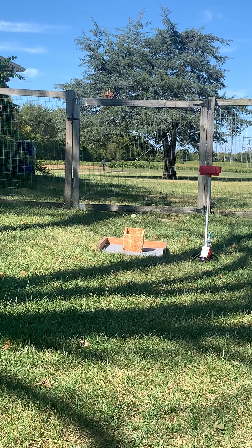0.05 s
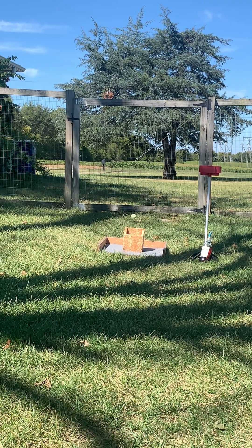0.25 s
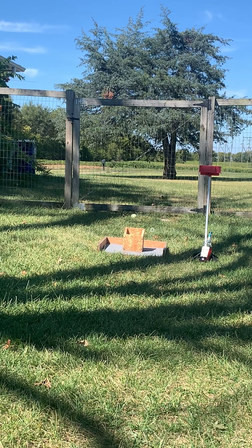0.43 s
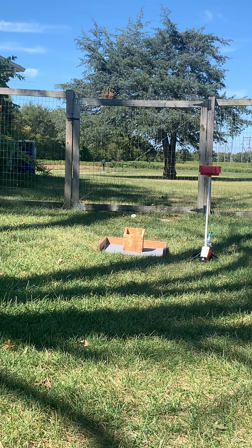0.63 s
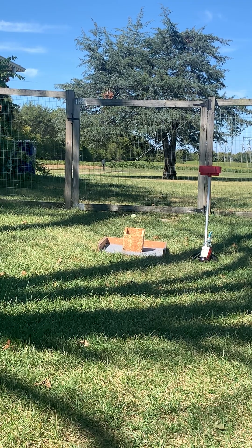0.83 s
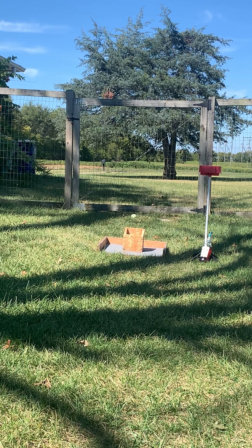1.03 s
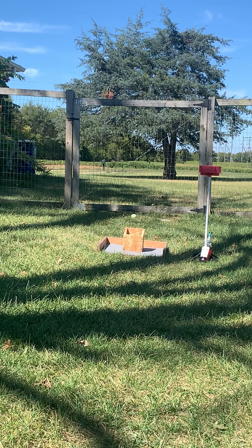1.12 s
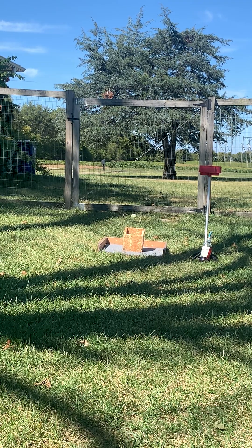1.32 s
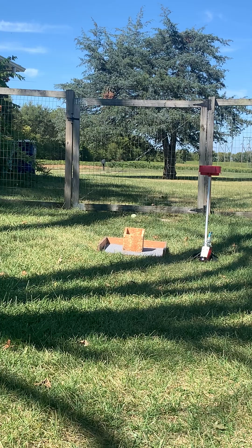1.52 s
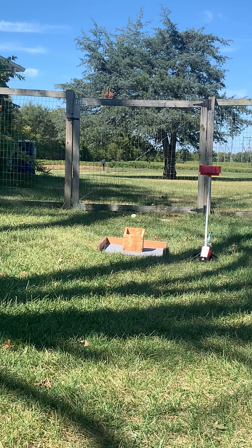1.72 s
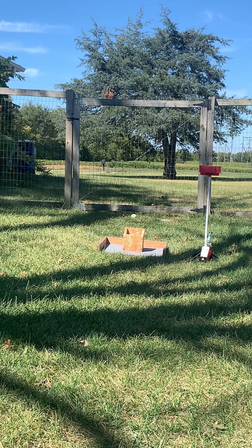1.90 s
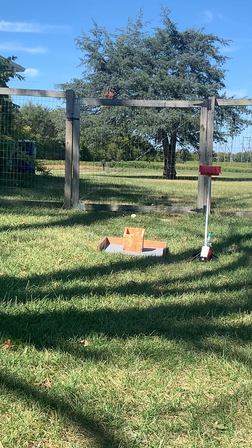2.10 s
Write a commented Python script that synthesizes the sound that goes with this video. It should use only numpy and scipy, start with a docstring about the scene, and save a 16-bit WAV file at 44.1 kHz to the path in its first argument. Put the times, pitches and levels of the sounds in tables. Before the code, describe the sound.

A thrown metal washer hits a wooden board with one hard, dry clack near the start, a thin high ring and short yard echoes following; soft insects, leaves and later low wind buffeting on the microphone.

```python
"""A washer knocks on a wooden board in an open yard, rings as it tumbles, and echoes follow the knock.
Low wind buffets the microphones over a hum, leaf rustle, an insect chorus, trills and cricket chirps.
Short pushes set off fading tones for the board; beating tones make the washer, delayed noise the echoes.
Wind, leaves and chorus are shaped noise; hum, trills and chirps are sine waves that change over time."""
import sys
import numpy as np
from scipy import signal
from scipy.fft import rfft, irfft, next_fast_len
from scipy.io import wavfile
from scipy.ndimage import uniform_filter1d

SR = 44100
rng = np.random.default_rng(int(sys.argv[2]) if len(sys.argv) > 2 else 0)


def transcribe(signal):
    """Save signal, clipped to [-1, 1], as a 16-bit WAV file at the path in sys.argv[1]."""
    frames = np.atleast_2d(signal).T
    limited = np.clip(frames, -1, 1)
    pcm = np.round(limited * 32767).astype(np.int16)
    wavfile.write(sys.argv[1], SR, pcm)


N = 94815

# Washer touching the board. Each row: time in seconds, level in dB, contact time in ms,
# treble tilt in dB per octave about 1400 Hz.
CONTACTS = [(.2205, -34, 0.25, -2), (.2219, -14, 0.39, 8.5), (.2234, -17.5, 0.24, 8),
            (.2246, -9, 0.24, 9.5), (.2254, 1, 0.79, 5), (.2268, -2.5, 0.54, 7), (.2284, -2.5, 0.59, 8.5),
            (.2319, -25.5, .3, 0.5)]
# Tones of the board. Each row: pitch in Hz, level in dB before the tilt, time to fade by 60 dB in seconds.
BOARD_MODES = [(241, -16, 0.035), (366, -6.5, 0.039), (504, -3.5, 0.03), (540, -6.5, .022),
               (660, -21, 0.013), (790, -20.5, 0.012), (1016, -2, 0.017), (1450, -5.5, 0.025),
               (1757, -1, 0.018), (1964, -11.5, 0.021), (2310, -14, 0.016), (2632, -0.5, 0.008),
               (3150, -14, 0.014), (3781, -6, 0.015), (4355, -19, 0.013), (5447, -28.5, .011),
               (6413, -38, 0.015), (8450, -43.5, 0.017)]
# Echoes. Each row: delay after the knock in seconds, level in dB, spread in seconds,
# lowest pitch in Hz, highest pitch in Hz.
ECHOES = [(0.013, -29, 0.002, 480, 800), (.023, -24, .003, 750, 1250), (0.02, -21.5, 0.0027, 714.5, 3399),
          (.036, -23, 0.0065, 330, 800), (0.029, -31, 0.0053, 1510, 4162), (0.036, -33, .006, 600, 2200),
          (.064, -28, 0.009, 498, 4500), (.075, -29, 0.022, 980, 2400), (.094, -25, 0.012, 312, 5186),
          (.092, -29, 0.0055, 2233, 4960), (.1, -33, .04, 300, 800), (.13, -32.5, 0.022, 294, 4700),
          (0.177, -36, 0.036, 301.3, 4400), (.28, -49, 0.053, 320, 2593)]
ECHO_RING_SHARE = 0.15  # scattered returns blur the board's ring, so its fade times are shortened
CRACK_DB, CRACK_HZ, CRACK_T60_S = -29, (4300, 9500), .02  # level before rise and fade, band, fade time

# Tones of the washer. Each row: pitch in Hz, relative level in dB.
WASHER_MODES = [(5231, -6.5), (5261, 1.5), (5313, -2.5), (6400, -28.5)]
# Loudness of the washer. Each row: time in seconds, level in dB before a 9 dB lift.
WASHER_LEVEL = [(0.228, -80.5), (0.25, -67.5), (0.274, -70.5), (0.3, -59.5), (0.332, -52), (0.402, -61),
                (0.42, -56), (0.498, -75.5), (0.558, -75.5), (0.638, -102), (0.65, -114)]
TUMBLE_HZ, TUMBLE_DEPTH = 21.02, 0.1  # throbs per second, share of the level
WOBBLE_TURNS, WOBBLE_DB = .15, 4  # typical wander of each tone, in turns of phase and in dB

# Tone colour of the wind. Each row: pitch in Hz, relative level in dB per Hz.
WIND_COLOUR = [(12, -42.5), (20, -13.5), (48, 9.5), (87, 5), (203, -15), (275, -32.5), (319, -25),
               (400, -35.5), (520, -57), (880, -120)]
# Loudness of the wind. Each row: time in seconds, level in dB before a 1 dB cut.
WIND_LEVEL = [(0.0, -47.5), (0.24, -56), (0.29, -77), (0.34, -55.5), (0.46, -54), (0.5, -62.5), (0.87, -72),
              (0.95, -57.5), (0.98, -52), (1.02, -57), (1.07, -46.5), (1.12, -55), (1.14, -47),
              (1.21, -43.5), (1.23, -46), (1.29, -38), (1.32, -45.5), (1.35, -46.5), (1.44, -47.5),
              (1.51, -55), (1.56, -42.5), (1.58, -48), (1.62, -66), (1.76, -67), (1.84, -45.5), (1.95, -58),
              (1.99, -46.5), (2.03, -72.5), (2.1, -50), (2.15, -72.5)]
# Higher flutter in strong gusts. Each row: pitch in Hz, relative level in dB per Hz.
FLUTTER_COLOUR = [(130, 0), (200, -5), (300, -16), (450, -19), (650, -31.5)]
# Loudness of the flutter. Each row: time in seconds, level in dB before a 3.5 dB cut.
FLUTTER_LEVEL = [(0.9, -92), (0.962, -65), (1.236, -60), (1.268, -51.5), (1.356, -73), (1.38, -54.5),
                 (1.422, -54.5), (1.504, -83), (1.554, -60), (1.692, -94), (1.742, -84), (1.78, -92),
                 (1.832, -78), (1.978, -76.5), (2.122, -71.5), (2.15, -88)]
# Wind slaps. Each row: start in seconds, level in dB, starting pitch in Hz,
# time to fade by 60 dB in seconds.
SLAPS = [(.97, -39.5, 100, 0.072), (1.06, -36, 94.7, 0.06), (1.142, -46, 85, 0.058), (1.196, -39, 65, 0.06),
         (1.262, -36, 138.4, 0.022), (1.274, -24.5, 99.2, 0.1), (1.376, -38.5, 92.5, 0.088),
         (1.383, -32.5, 287, 0.017), (1.385, -40.5, 526, 0.012), (1.407, -33.5, 107.5, 0.075),
         (1.43, -35, 85, 0.16), (1.545, -40.5, 110, 0.076), (1.556, -39.5, 98.4, 0.068),
         (1.573, -42, 75, 0.067)]
SLAP_RISE_S, SLAP_SAG = 0.00303, 4.15  # rise time; how strongly the pitch sags, per second

# Lines of the hum. Each row: middle pitch in Hz, relative level in dB.
HUM_LINES = [(58.5, -3.5), (107.7, -6.5), (216, -17.5)]
# Loudness of the hum. Each row: time in seconds, level in dB, extra dB for the lowest and highest lines.
HUM_LEVEL = [(0, -47.5, -10), (.22, -49, 0.5), (.27, -68, 3), (.34, -52, 7.5), (.46, -54.5, 4),
             (.52, -58, 0), (.8, -74, -6), (1.5, -69, -12), (1.65, -55.5, -14), (2.15, -52, -2)]

# Tone colour of the leaves. Each row: pitch in Hz, relative level in dB per Hz.
LEAVES_COLOUR = [(120, -16), (300, -5.5), (700, -13), (1300, -11.5), (2000, -17.5), (3000, -21),
                 (4000, -21.5), (5000, -32), (6000, -34.5), (7000, -23), (7800, -24)]
# Loudness of the leaves. Each row: time in seconds, level in dB before a 0.5 dB lift.
LEAVES_LEVEL = [(0, -58.5), (.2, -58.5), (.4, -57), (.5, -67.5), (.7, -71), (.9, -78), (.97, -68),
                (1.03, -60.5), (1.07, -59.5), (1.2, -61.5), (1.26, -60), (1.3, -69), (1.45, -72),
                (1.7, -72.5), (1.86, -72.5), (1.94, -69.5), (2.15, -70)]

# Tone colour of the insect chorus. Each row: pitch in Hz, relative level in dB per Hz.
CHORUS_COLOUR = [(6500, -20), (7500, -29), (8300, 2.5), (9200, -3), (10000, 0), (11500, -1), (13000, -0.5),
                 (14800, -2.5), (15700, -5.5)]
# Loudness of the chorus. Each row: time in seconds, level in dB before a 5 dB lift.
CHORUS_LEVEL = [(0.0, -62), (0.18, -61.5), (0.54, -64), (0.66, -65.5), (0.93, -67.5), (1.51, -63.5),
                (1.85, -63), (2.15, -60.5)]
# The near trilling insect, then a fainter one. Each row: top pitch in Hz, pitch drop in Hz
# at half a note from the top, notes per second, middle of one note in seconds, relative level in dB.
TRILLERS = [(7250, 500, 23.26, .343, 0), (7950, 400, 16.1, 1.232, -5)]
# Loudness of both trillers. Each row: time in seconds, peak level in dB before each one's own level.
TRILL_LEVEL = [(0, -65.5), (.1, -69.5), (.2, -63), (.26, -76), (.34, -65), (.43, -63), (.5, -70),
               (.6, -68.5), (.7, -84), (.8, -86), (.95, -78.5), (1.03, -63.5), (1.2, -64.5), (1.3, -73),
               (1.42, -80), (2.15, -80)]
NOTE_S = .028  # length of one trill note
# Cricket chirps. Each row: start in seconds, length in seconds, pitch in Hz, level in dB before roughness.
CHIRPS = [(0.021, 0.024, 4350, -52.5), (0.293, 0.057, 4350, -52), (0.337, 0.033, 4300, -55),
          (0.406, 0.021, 4500, -55), (.66, 0.014, 4370, -75), (0.693, 0.023, 4360, -69),
          (.735, 0.016, 4350, -72), (1.045, .05, 4330, -58.5), (1.077, 0.076, 4370, -58),
          (1.265, 0.019, 4550, -67), (1.306, 0.028, 4610, -68), (2.07, 0.038, 4330, -65),
          (2.109, 0.031, 4350, -68)]

# Microphone pair, for sounds in the air. Each row: pitch in Hz, phase lead of the left in radians.
AIR_PORTS = [(0, 0), (1100, 0), (1300, .8), (2500, 3.0), (3300, 1.6), (4600, 3.14), (6700, 6.28),
             (11000, 12.57), (15400, 18.85), (22050, 28.4)]
# The pair again, for the knock from the board. Each row: pitch in Hz, phase lead of the left in radians.
KNOCK_PORTS = [(0, 0), (700, 0), (900, .15), (1100, .6), (1450, 2.2), (1900, 2.9), (2300, 1.9), (2600, 1.6),
               (3400, 1.5), (4600, 3.0), (6700, 6.1), (11000, 12.4), (15400, 18.85), (22050, 28.4)]
# The pair again, for the echoes. Each row: pitch in Hz, phase lead of the left in radians.
ECHO_PORTS = [(0, 0), (1000, 0), (1500, 1.1), (2200, 2.1), (2800, 2.4), (3200, 1.7), (4600, 3.0),
              (6700, 6.28), (22050, 28.4)]
BOTTOM_HZ, TOP_HZ = 34.21, 15800  # where the microphone's bass and treble cuts begin
CEILING = .95  # level that rounded peaks stay under


def undb(db):
    """Turn dB into a plain multiplier."""
    return 10 ** (np.asarray(db) / 20)


def clock():
    """The time of every sample, in seconds."""
    return np.arange(N) / SR


def curve(table, axis=1):
    """Join the points of one table column over time with straight lines."""
    points = np.array(table, float)
    return np.interp(clock(), points[:, 0], points[:, axis])


def unit(x):
    """Scale a signal to an average strength (rms) of 1."""
    return x / np.sqrt(np.mean(x ** 2))


def walk(rate):
    """Slow random wandering of rms 1: held random steps, `rate` per second, smoothed twice."""
    hold = int(SR / rate)
    steps = np.repeat(rng.standard_normal(N // hold + 1), hold)
    smooth = uniform_filter1d(uniform_filter1d(steps, hold), hold)
    return unit(smooth[:N])


def bands(table, flicker_db, rate):
    """Noise of a given colour in third-octave bands that each flicker alone; rms 1."""
    size = next_fast_len(N, True)
    colour = np.array(table, float)
    freqs = np.fft.rfftfreq(size, 1 / SR) + 1e-3  # the tiny shift avoids log(0)
    gain = undb(np.interp(np.log(freqs), np.log(colour[:, 0]), colour[:, 1]))
    octaves = np.log2(colour[-1, 0] / colour[0, 0])
    out = 0
    for hz in colour[0, 0] * 2 ** np.arange(0, octaves + 1 / 3, 1 / 3):
        # neighbouring bands overlap smoothly
        window = np.cos(np.pi / 2 * np.clip(3 * np.log2(freqs / hz), -1, 1))
        white = rng.standard_normal(2 * len(freqs)).view(complex)
        band = irfft(white * gain * window, size)[:N]
        out = out + band * undb(flicker_db * walk(rate))
    return unit(out)


def ring(hz, t60, t):
    """A struck tone: a sine wave that starts at t = 0 and fades by 60 dB in t60 seconds."""
    fade = np.exp(-np.log(1000) * np.maximum(t, 0) / t60)
    return (t > 0) * np.sin(2 * np.pi * hz * t) * fade


def knock(share=1):
    """Brief pushes make the board ring; each contact has its own strength, dullness and treble tilt."""
    t, out = clock()[:SR // 2], 0
    for start, db, contact_ms, tilt_db in CONTACTS:
        # a longer push is duller; a quarter of the contact time is one sigma
        push = np.exp(-.5 * ((t - start) / (contact_ms / 4000)) ** 2)
        body = 0
        for k, (hz, level_db, t60) in enumerate(BOARD_MODES):
            gain = undb(level_db + tilt_db * np.log2(hz / 1400))
            body = body + (-1) ** k * gain * ring(hz, t60 * share, t[:4096])
        out = out + undb(db) * signal.fftconvolve(push / push.sum(), body)
    return np.pad(out, (0, N - len(out)))


def crack():
    """Splintery hiss from the fourth contact on: band-limited noise that rises fast, then dies."""
    t = clock() - CONTACTS[3][0]
    band = signal.butter(2, CRACK_HZ, "band", fs=SR, output="sos")
    hiss = unit(signal.sosfilt(band, rng.standard_normal(N)))
    rise = np.clip(t / 0.0055, 0, 1)
    fade = undb(-60 * np.maximum(t, 0) / CRACK_T60_S)
    return undb(CRACK_DB) * hiss * rise * fade


def washer():
    """A ringing disc: close tones beat, tumbling smears their pitch and level, and the ring throbs."""
    t, tones = clock(), 0
    for hz, db in WASHER_MODES:
        turns = hz * t + WOBBLE_TURNS * walk(22) + rng.random()
        tones = tones + undb(db + WOBBLE_DB * walk(16)) * np.sin(2 * np.pi * turns)
    on = np.clip((t - CONTACTS[4][0]) / 0.0011, 0, 1) * (t < WASHER_LEVEL[-1][0])  # from the fifth contact
    throb = 1 + TUMBLE_DEPTH * np.sin(2 * np.pi * TUMBLE_HZ * t)
    return unit(tones) * on * undb(curve(WASHER_LEVEL) + 9.0) * throb


def yard(x):
    """Fence and trees return delayed copies, smeared by short bursts of filtered noise."""
    t, answer = clock()[:SR], 0
    for delay, db, spread, lo_hz, hi_hz in ECHOES:
        b, a = signal.butter(2, [lo_hz, hi_hz], "band", fs=SR)
        smear = signal.lfilter(b, a, rng.standard_normal(len(t)))
        smear = smear * (t > 0) * np.exp(-.5 * ((t - delay) / spread) ** 2)
        answer = answer + undb(db) * smear / np.sqrt(np.sum(smear ** 2))  # equal energy before the level
    return signal.fftconvolve(x, answer)[:N]


def wind():
    """Moving air makes low noise, higher flutter in strong gusts, and slaps: fading tones that sag."""
    t, slaps = clock(), 0
    for start, db, hz, t60 in SLAPS:
        sagging_hz = hz / (1 + SLAP_SAG * np.clip(t - start, 0, .1))
        rise = np.clip((t - start) / SLAP_RISE_S, 0, 1)
        slaps = slaps + undb(db) * ring(sagging_hz, t60, t - start) * rise
    flutter = bands(FLUTTER_COLOUR, flicker_db=0.5, rate=30) * undb(curve(FLUTTER_LEVEL) - 3.5)
    buffeting = bands(WIND_COLOUR, flicker_db=0.5, rate=18) * undb(curve(WIND_LEVEL) - 1)
    return buffeting + flutter + slaps


def hum():
    """Three low sine waves that waver slightly in pitch and level."""
    lines = []
    for hz, db in HUM_LINES:
        pitch = hz * (1 + 0.011 * walk(2.8))
        lines.append(undb(db + 0.5 * walk(6.7)) * np.sin(2 * np.pi * np.cumsum(pitch) / SR))
    outer = (lines[0] + lines[2]) * undb(curve(HUM_LEVEL, axis=2))
    return np.sqrt(2) * undb(curve(HUM_LEVEL)) * (outer + lines[1])


def leaf_rustle():
    """Many small leaf sounds blend into flickering noise."""
    return bands(LEAVES_COLOUR, flicker_db=1.5, rate=45) * undb(curve(LEAVES_LEVEL) + 0.5)


def crickets():
    """Short whistles that swell and fade, made rough by a quickly wandering level."""
    t, chirps = clock(), 0
    for start, length, hz, db in CHIRPS:
        swell = np.sin(np.pi * np.clip((t - start) / length, 0, 1))
        chirps = chirps + undb(db) * swell * np.sin(2 * np.pi * hz * t)
    return undb(4.0 * walk(400)) * chirps


def trill(hz, drop_hz, rate, middle, db):
    """Steadily repeated notes; each arches up to its top pitch and falls away."""
    place = ((clock() - middle) * rate + .5) % 1 - .5
    x = place / (rate * NOTE_S / 2)  # -1 at the note's start, 1 at its end
    pitch = hz - drop_hz * np.clip(x + .25, -1.3, 1.3) ** 2 + 55 * walk(200)
    loudness = undb(db + 2.0 * walk(90)) * np.clip(1 - x ** 2, 0, 1)
    return loudness * np.sin(2 * np.pi * np.cumsum(pitch) / SR)


def insects():
    """Many insects blur into treble noise, with two trillers standing out."""
    chorus = undb(5.0) * bands(CHORUS_COLOUR, flicker_db=0.5, rate=19) * undb(curve(CHORUS_LEVEL))
    trills = sum(trill(*row) for row in TRILLERS) * undb(curve(TRILL_LEVEL))
    return chorus + trills


def ports(x, table):
    """Make left and right differ in phase only, half the lead on each side."""
    points = np.array(table)
    lead = np.interp(np.fft.rfftfreq(N, 1 / SR), points[:, 0], points[:, 1])
    return irfft(rfft(x) * np.exp(.5j * np.array([lead, -lead])), N)


def scene():
    """Add the knock, its echoes and the sounds in the air, each with its own stereo phase."""
    struck = ports(knock() + crack(), KNOCK_PORTS)
    echoes = ports(yard(knock(ECHO_RING_SHARE)), ECHO_PORTS)
    air = washer() + wind() + hum() + leaf_rustle() + insects() + crickets()
    return struck + echoes + ports(air, AIR_PORTS)


def record(dry):
    """The microphone cuts the deep bass, rounds the highest peaks and cuts the top."""
    thin = signal.sosfilt(signal.butter(2, BOTTOM_HZ, "high", fs=SR, output="sos"), dry)
    rounded = thin / (1 + (thin / CEILING) ** 8) ** .125
    return signal.sosfilt(signal.ellip(12, .2, 90, TOP_HZ, fs=SR, output="sos"), rounded)


dry = scene()
out = record(dry)
transcribe(out)
```